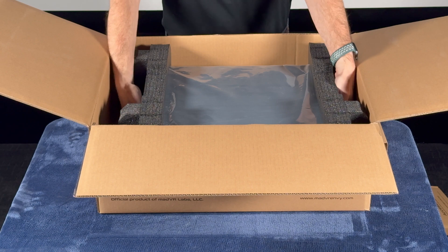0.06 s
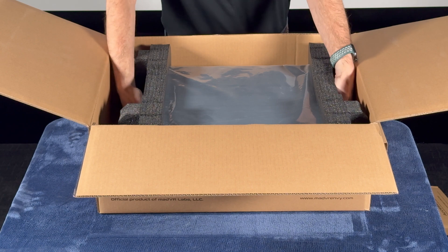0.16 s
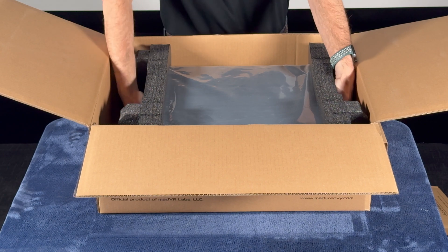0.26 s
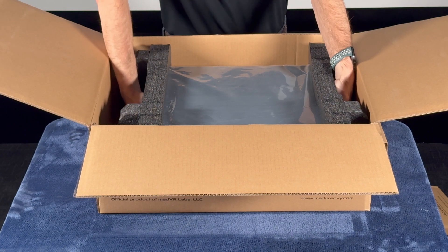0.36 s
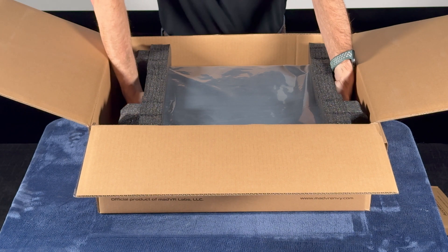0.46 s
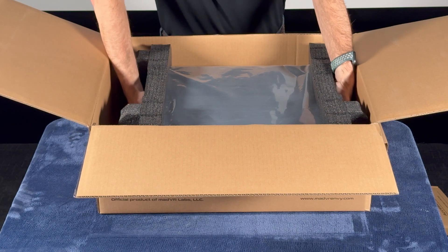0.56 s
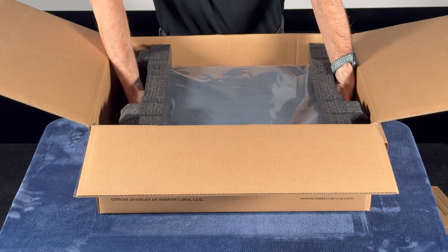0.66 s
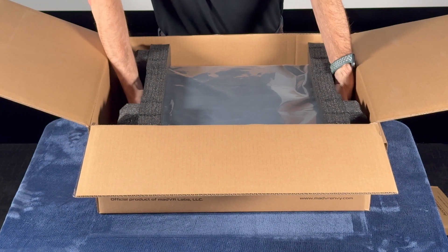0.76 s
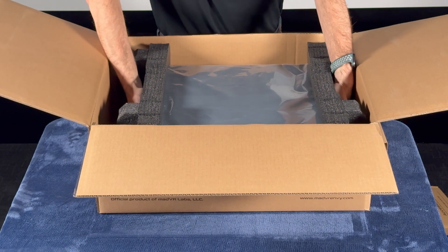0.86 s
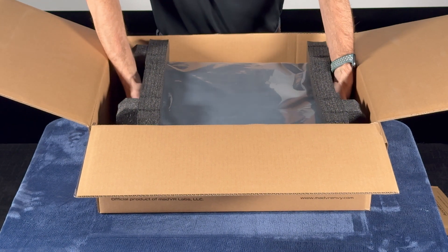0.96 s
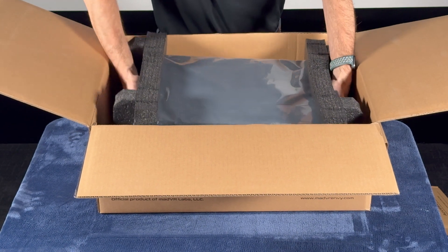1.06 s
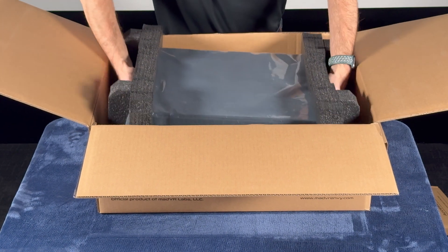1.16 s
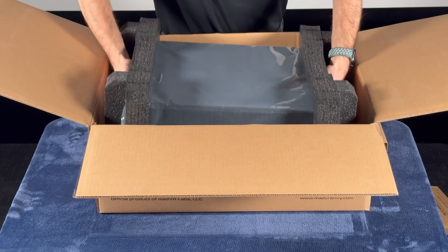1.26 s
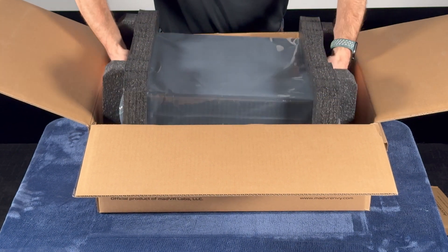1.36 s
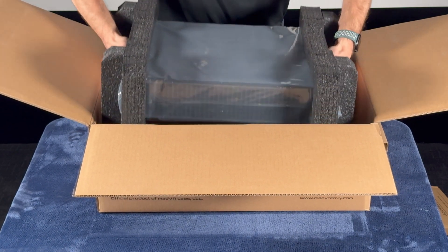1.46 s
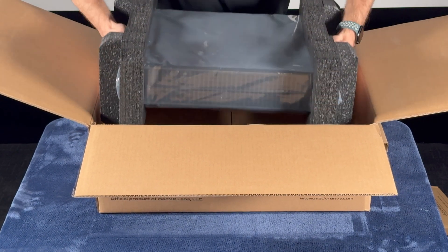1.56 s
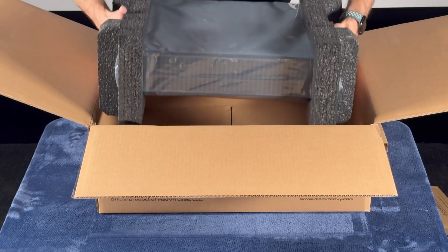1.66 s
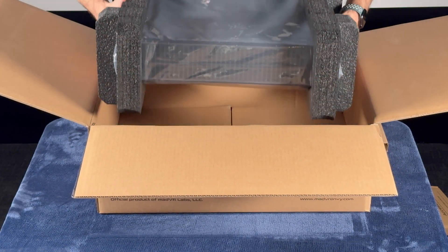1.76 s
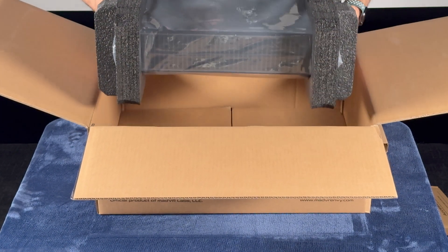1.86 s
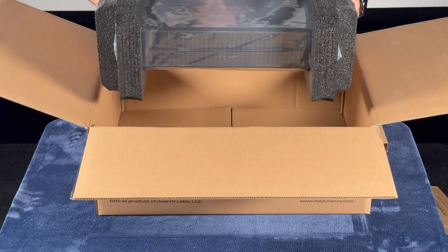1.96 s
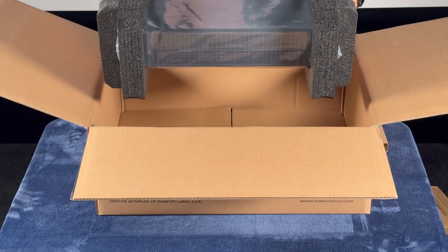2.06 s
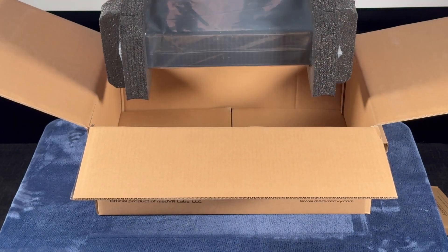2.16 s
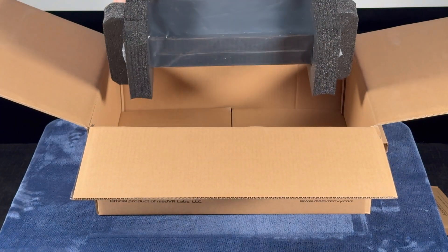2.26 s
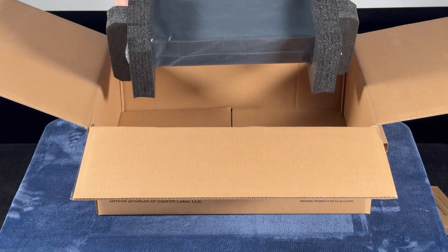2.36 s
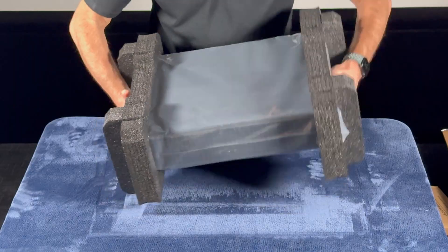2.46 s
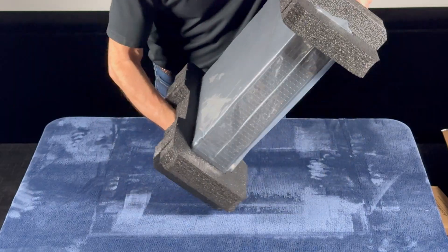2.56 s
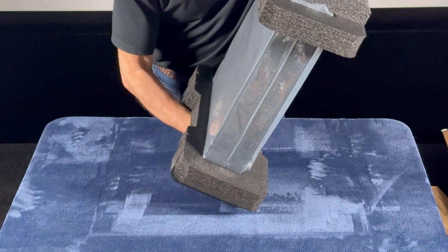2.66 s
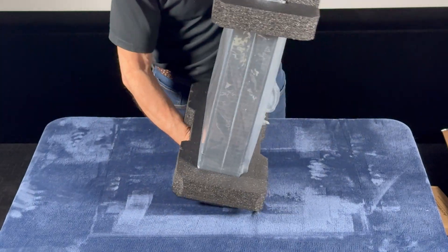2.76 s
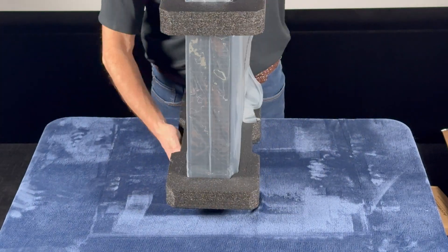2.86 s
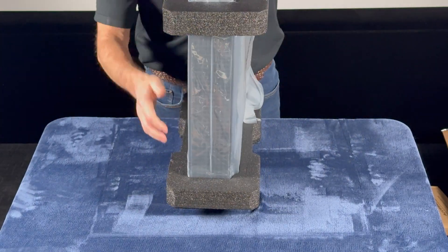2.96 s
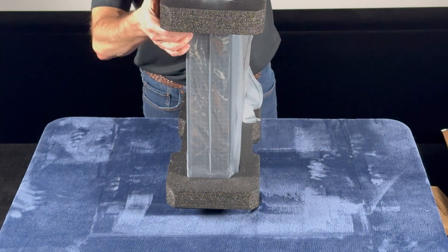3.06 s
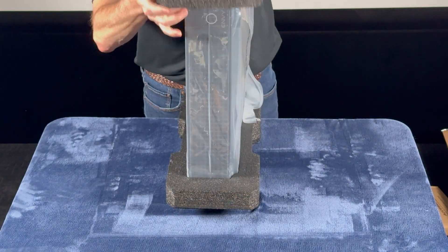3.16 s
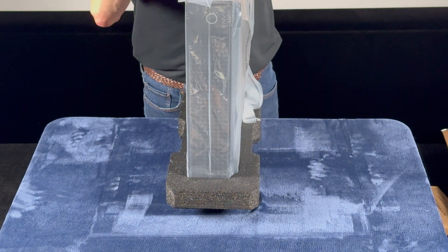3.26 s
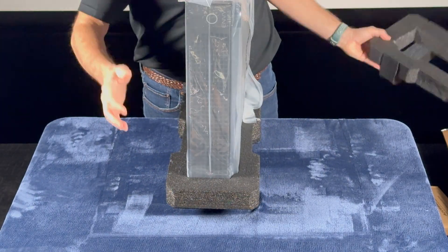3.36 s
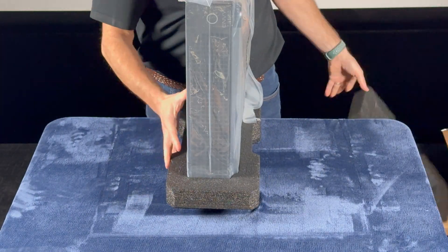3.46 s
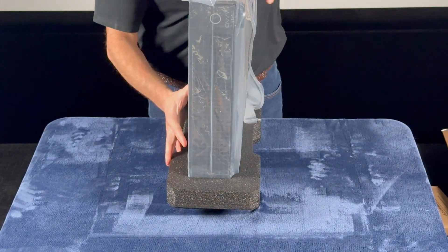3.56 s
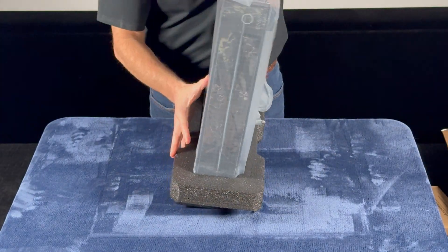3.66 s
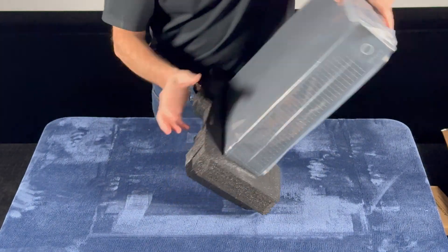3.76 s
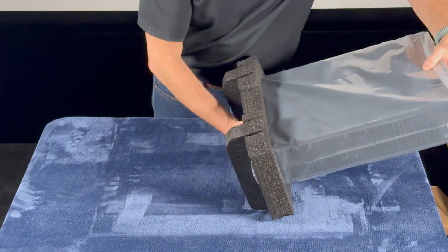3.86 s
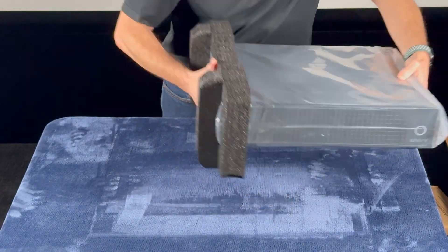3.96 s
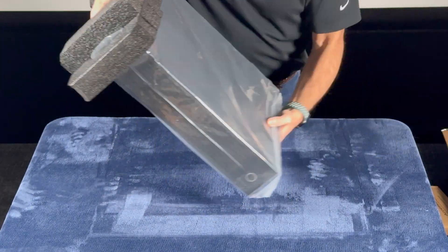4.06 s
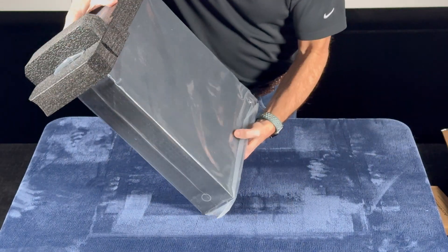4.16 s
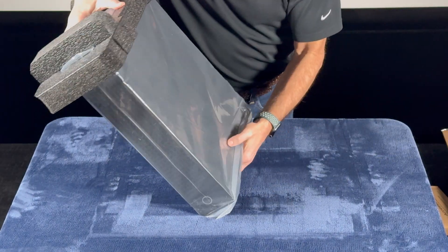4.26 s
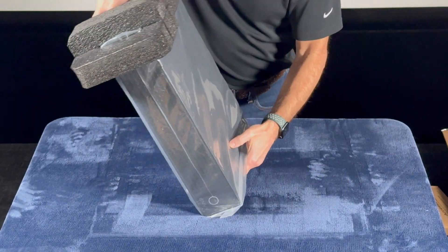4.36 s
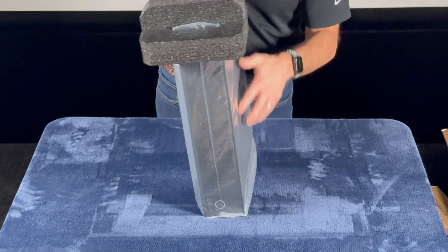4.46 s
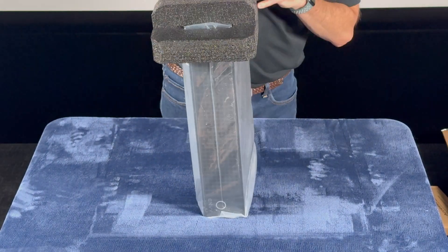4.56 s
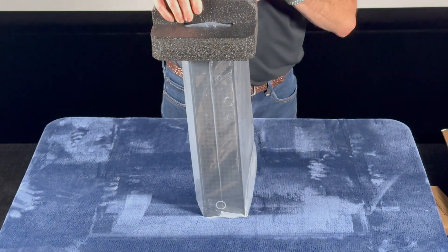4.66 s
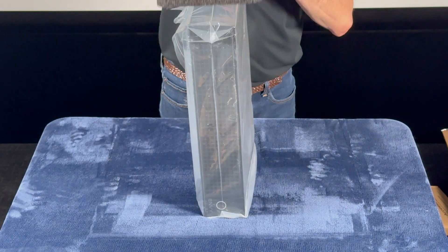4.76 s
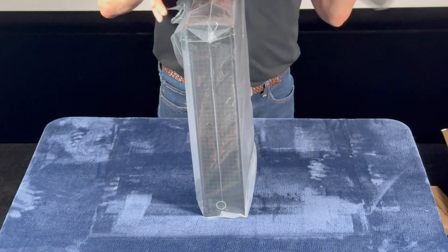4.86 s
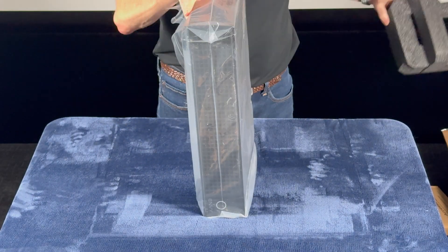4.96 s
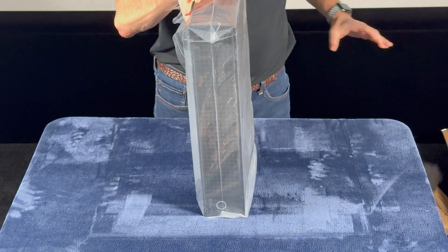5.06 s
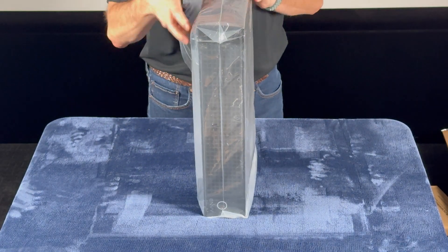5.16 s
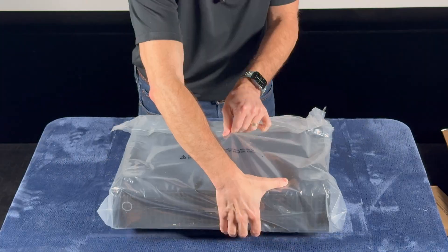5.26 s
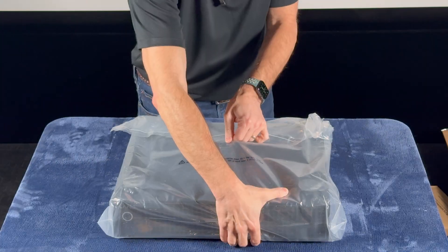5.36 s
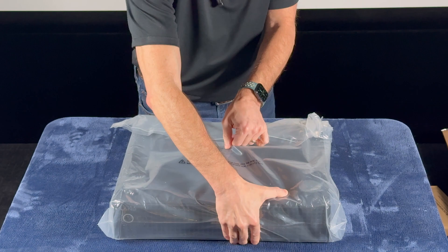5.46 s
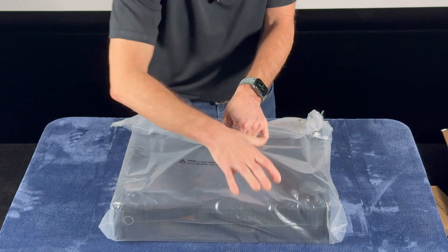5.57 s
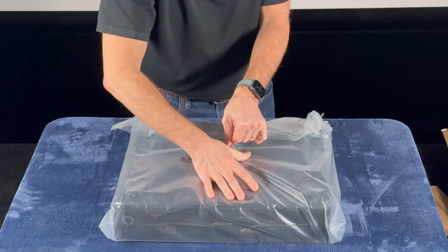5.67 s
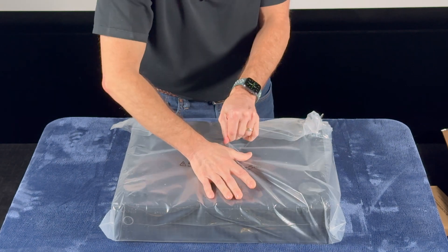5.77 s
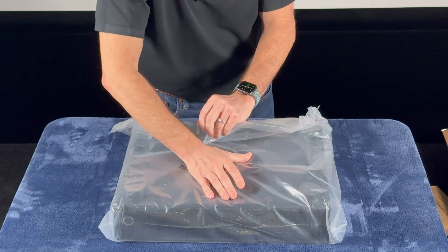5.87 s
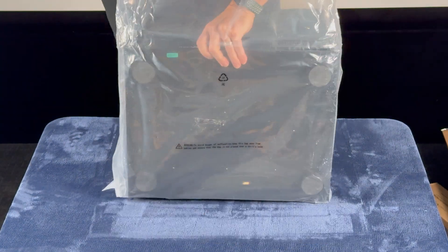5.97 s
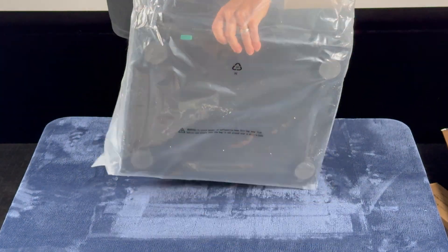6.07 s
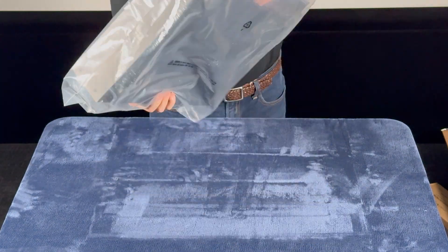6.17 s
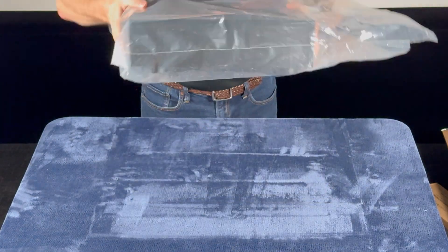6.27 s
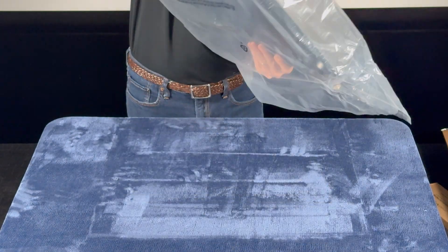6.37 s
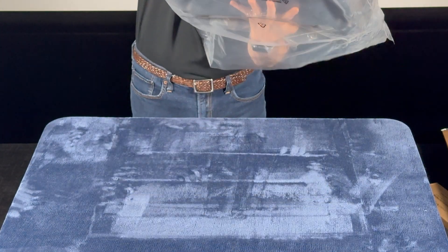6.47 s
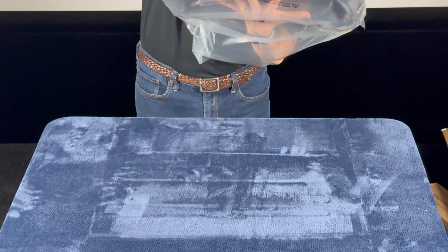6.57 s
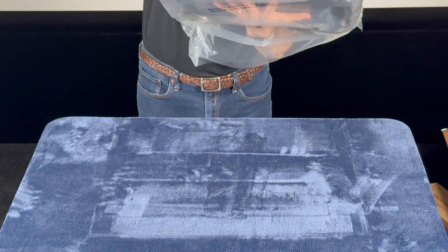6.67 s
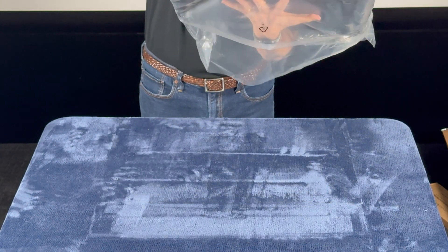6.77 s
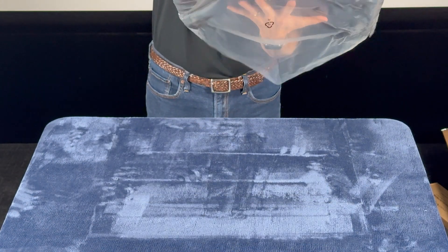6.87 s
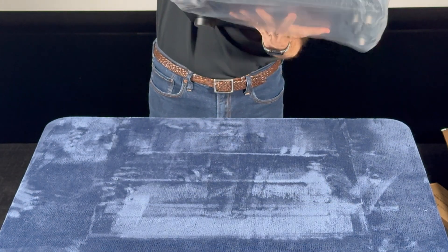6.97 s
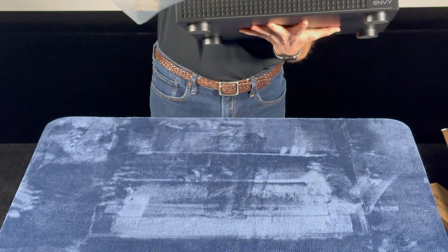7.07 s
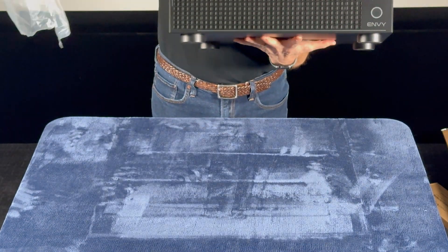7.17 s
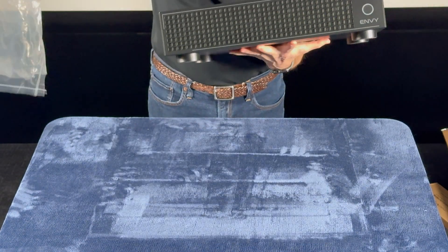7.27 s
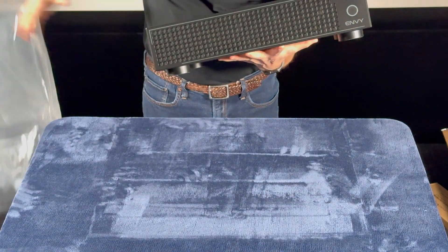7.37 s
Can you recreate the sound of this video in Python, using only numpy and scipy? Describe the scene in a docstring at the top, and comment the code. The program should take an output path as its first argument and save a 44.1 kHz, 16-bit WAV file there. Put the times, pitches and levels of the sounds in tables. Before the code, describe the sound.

Close, dry unboxing: soft hand knocks on cardboard, a rough foam drag, scattered plastic snaps, then a dense, loud burst of crinkling and flapping bag.

```python
"""Unpacking a boxed unit from a carton

A boxed unit in foam end caps is gripped and dragged up out of a cardboard carton, then turned about on a padded table.
Close to one microphone, slips of foam ring foam, carton and air gap; pops and hand bumps ring as short decaying events.
Then the thin plastic bag rustles and snaps as swarms of clicks through resonances, and its large folds flap low.
Behind it lies a very quiet room, made of coloured noise."""
import sys
import numpy as np
from scipy import signal
from scipy.io import wavfile

SR = 44100
rng = np.random.default_rng(int(sys.argv[2]) if len(sys.argv) > 2 else 0)


def generate_wav(sig):
    """Save sig (samples, or channels by samples) to the path in sys.argv[1] as 16-bit PCM at SR."""
    pcm = np.round(np.clip(np.atleast_2d(sig).T, -1, 1) * 32767).astype(np.int16)
    wavfile.write(sys.argv[1], SR, pcm)


N = 327296

LEAD, SPAN = int(.04 * SR), int(.16 * SR)   # samples before an event's peak and in all

# The hands shift on the bag. Each row: start in seconds, length in seconds, then at the start the rustle in dB,
# sizzle in dB and low flapping in dB, and the change of all three from start to end in dB.
GRIPS = [(2.686, 0.072, -56.5, -58, -69.5, -8.5), (2.777, 0.056, -56, -53.5, -65, -15.5),
         (2.843, 0.098, -73.5, -67, -75, 0.5), (2.942, 0.09, -50.5, -56.5, -61.5, 3),
         (3.043, 0.068, -39.5, -46.5, -60.5, -14.5), (3.14, 0.069, -54, -60, -72, -8),
         (3.262, 0.069, -45.5, -44.5, -48, -1.5), (3.344, 0.15, -55, -51, -68, -7),
         (3.752, 0.015, -39, -77, -41, -31), (3.811, 0.068, -63, -72, -71, 4),
         (3.916, 0.052, -57, -70, -73, -12), (3.966, 0.07, -48.5, -51, -55, -19),
         (4.032, 0.12, -43, -46, -55.5, -13), (4.218, 0.065, -56, -63, -63, -7),
         (4.294, 0.051, -55, -70, -61, -21), (4.359, 0.045, -49.5, -55, -79, -21),
         (4.413, 0.075, -42.5, -55.5, -53, -7), (4.5, 0.031, -56, -60.5, -70, 14.5),
         (4.535, 0.14, -54.5, -55, -47, -12.5), (4.647, 0.056, -45, -45, -51, 9.5),
         (4.735, 0.096, -48.5, -44, -44, -15.5), (4.874, 0.035, -38, -37.5, -62, -27),
         (4.922, 0.089, -54, -57, -71.5, 8), (5.332, 0.065, -67.5, -62, -72, -11.5),
         (5.413, 0.09, -77.5, -83, -79, -6), (5.627, 0.091, -68, -82, -65, -7),
         (5.69, 0.089, -51.5, -64, -54.5, -3), (5.852, 0.057, -53, -59, -62.5, -0.5),
         (5.921, 0.096, -61, -50.5, -67, -13), (6.021, 0.025, -37, -37, -55, -15),
         (6.071, 0.064, -67, -65, -76, -3), (6.191, 0.035, -54, -64, -84, 13)]
# The bag slides off. Each row: time in seconds, rustle in dB, sizzle in dB, low flapping in dB.
SLIDE = [(6.27, -120, -101, -74), (6.288, -49, -61, -64), (6.372, -38.5, -45, -49.5),
         (6.406, -18.5, -32.5, -31.5), (6.506, -42.5, -50, -37.5), (6.59, -30.5, -37.5, -39),
         (6.606, -45, -54, -40.5), (6.692, -32, -29, -33), (6.714, -30.5, -44, -22.5),
         (6.788, -42.5, -45, -33), (6.804, -26, -31, -31.5), (6.852, -41.5, -44.5, -34),
         (6.932, -22, -49, -28), (7.092, -45, -51, -56.5), (7.106, -31, -21, -32),
         (7.14, -30, -35.5, -32.5), (7.192, -40.5, -46.5, -53), (7.214, -20, -28, -36.5),
         (7.262, -44, -45, -61.5), (7.336, -84.5, -84, -77), (7.42, -101, -108, -96)]


def from_db(db):
    """Decibels to gain."""
    return 10 ** (np.asarray(db) / 20)


def rms_one(x):
    """Scale to unit rms."""
    return x / np.sqrt(np.mean(x ** 2) + 1e-20)


def in_time(rows):
    """A switch that is on inside the table's time span, then its columns at every sample."""
    s, *columns = np.transpose(rows)
    t = np.arange(N) / SR
    return [(t >= s[0]) & (t <= s[-1])] + [np.interp(t, s, c) for c in columns]


def drift(rate_hz):
    """Slow chance of rms 1: noise through two equal low-pass poles."""
    r = np.exp(-2 * np.pi * rate_hz / SR)
    slow = signal.lfilter([1], [1, -2 * r, r * r], rng.standard_normal(N + SR))
    return rms_one(slow[SR:])   # the first second settles the filter


def grains(per_s, spread_db):
    """Random micro-clicks of uneven size and either sign; rms 1."""
    sizes = from_db(spread_db * np.minimum(rng.exponential(1, N), 5)) * rng.choice([-1, 1], N)
    return rms_one(sizes * (rng.random(N) < per_s / SR))


def resonate(x, hz, width_hz):
    """Two-pole resonance with gain 1 on top."""
    r = np.exp(-np.pi * width_hz / SR)
    zeros = np.array([1, 0, -1]) * (1 - r * r) / 2
    poles = [1, -2 * r * np.cos(2 * np.pi * hz / SR), r * r]
    return signal.lfilter(zeros, poles, x)


def low_pass(x, hz):
    """Steep treble cut."""
    return signal.sosfilt(signal.butter(4, hz, fs=SR, output="sos"), x)


def band_pass(x, order, low_hz, high_hz):
    """Keep what lies between two pitches."""
    return signal.sosfilt(signal.butter(order, [low_hz, high_hz], "band", fs=SR, output="sos"), x)


def colour(x, spectrum, patchy_db):
    """Half-octave bands set to a spectrum, each flickering on its own; rms 1."""
    hz, db = np.transpose(spectrum)
    edges, out = 23 * 2 ** np.arange(0, 10, .5), 0
    for k, (low, high) in enumerate(zip(edges, edges[1:])):
        if hz[0] < high and low < hz[-1]:
            band = band_pass(x, 2, low, high)
            level_db = np.interp(np.log(low * high) / 2, np.log(hz), db)
            gain = from_db(level_db + patchy_db * drift(44.0))
            out = out + (-1) ** k * band * gain   # alternate signs join the bands without notches
    return rms_one(out)


def add(out, s, sound, swell_s, t60, tail_db, soft_s=0):
    """Lay in one event: it swells by 20 dB in swell_s to its peak at s, dies away and leaves a short tail."""
    tail_t60_s = 0.031   # a brief shiver outlasts short events
    t = (np.arange(SPAN) - LEAD) / SR
    away = np.hypot(t, soft_s) - soft_s   # a padded contact rounds the peak
    swell_db = -20 * away / max(swell_s, .0002)
    decay_db = -60 * away / np.clip(t60, .003, .2)
    main = from_db(np.where(t < 0, swell_db, decay_db))
    tail = (t > 0) * from_db(tail_db - 60 * t / tail_t60_s)
    i = round(s * SR) - LEAD
    out[max(i, 0):i + SPAN] += (sound * np.hypot(main, tail))[max(-i, 0):N - i]


def drag():
    """Dense slips of foam cells ring the foam, the carton walls and the air gap, which rises in pitch as it opens."""
    # Foam on cardboard. Each row: time in seconds, scrape in dB, carton boom in dB, fine hiss in dB.
    course = [(0.0, -63.5, -54, -70), (0.26, -69, -67, -78.5), (0.33, -57, -50, -70.5),
              (0.43, -67.5, -63, -78), (0.5, -56, -42.5, -66.5), (0.62, -71, -61, -74.5),
              (0.65, -73, -52, -82.5), (0.84, -64, -59.5, -83), (0.9, -80, -70, -72), (0.98, -65, -60, -84),
              (1.04, -76.5, -62, -88), (1.11, -54, -48, -79.5), (1.24, -36.5, -42.5, -51),
              (1.37, -39, -48.5, -51), (1.62, -38, -49, -46), (1.67, -37.5, -51, -46),
              (1.75, -32.5, -50, -44), (1.9, -40.5, -48.5, -49.5), (1.97, -35.5, -44.5, -42.5),
              (2.11, -38, -50, -52), (2.21, -70.5, -83, -80), (2.34, -84, -69.5, -100),
              (2.49, -101, -106, -108), (2.64, -101, -106, -107)]
    # Scrape resonances of the foam. Each row: pitch in Hz, width in Hz, level in dB.
    foam_modes = [(1300, 580, -8.5), (2140, 480, 1), (3440, 1060, -6), (4080, 2450, -11)]
    # The same resonances under light scuffing: one level in dB for each.
    scuff_db = [1.5, 8.5, -3, -8]
    # Carton walls. Each row: pitch in Hz, width in Hz, level in dB.
    wall_modes = [(56.2, 41, 5.5), (148, 31, 1.5), (245, 340, 4.5), (412, 360, 9)]
    # Spectrum of the fine hiss. Each row: frequency in Hz, density in dB per Hz.
    hiss_spectrum = [(2650, -32.5), (4500, 23.5), (6340, 12), (13900, -2), (15900, -15), (16200, -37),
                     (16500, -68)]
    lift_s, opening_s = 1.3, .2   # the foam starts up the wall; time constant of the air gap opening
    gap_shut_hz, gap_open_hz = 366, 736   # resonance of the air gap

    on, scrape_db, boom_db, hiss_db = in_time(course)
    opened = 1 - np.exp(-np.maximum(np.arange(N) / SR - lift_s, 0) / opening_s)
    gap_hz = gap_shut_hz + (gap_open_hz - gap_shut_hz) * opened
    grip = from_db(0.5 * drift(41.0))
    slips, shakes, fizz = (grains(7000.0, spread_db=3.0) * grip for part in range(3))

    wander_db = [3.0 * drift(7) for mode in foam_modes]   # the contact patch shifts: resonances come and go
    brighter_db = np.clip(hiss_db - scrape_db + 14.0, -14, 4)   # upper resonances open as the slide brightens
    broad, sharp = 0, 0
    for k, (hz, width, db) in enumerate(foam_modes):
        broad_gain = from_db(db + 0.36 * wander_db[k] + (hz > 2800) * brighter_db)
        broad = broad + (-1) ** k * broad_gain * resonate(slips, hz, 1.05 * width)
        ring = resonate(resonate(slips, hz, .65 * width), hz, .65 * width)
        sharp = sharp + from_db(scuff_db[k] + 1.5 * wander_db[k]) * ring
    walls = low_pass(sum(from_db(db) * resonate(shakes, hz, w) for hz, w, db in wall_modes), 550)

    gap, pitches = 0, np.geomspace(300, 900, 7)
    for hz in pitches:   # cross-fade between neighbouring pitches
        near = np.clip(1 - np.abs(np.log(gap_hz / hz)) / np.log(pitches[1] / pitches[0]), 0, 1)
        gap = gap + np.sqrt(near) * rms_one(resonate(resonate(shakes, hz, 280.0), hz, 600.0))

    # hard sliding blurs the foam's ring and excites the gap
    sliding = np.clip((scrape_db + 59.5) / 10.7, .05, .95)
    blur = np.maximum(sliding, .6 * opened)   # out in the open the ring stays blurred
    foam = np.sqrt(blur) * rms_one(broad) + np.sqrt(1 - blur) * rms_one(sharp)
    boom = np.sqrt(sliding) * gap + np.sqrt(1 - sliding) * rms_one(walls)
    hiss = colour(fizz, hiss_spectrum, patchy_db=0.7)
    return on * (from_db(scrape_db) * foam + from_db(hiss_db) * hiss + from_db(boom_db) * boom)


def room_air():
    """Faint noise, strongest in the bass, flickering band by band."""
    # Spectrum of the room. Each row: frequency in Hz, density in dB per Hz.
    air_spectrum = [(12, -34), (20, -1), (69, 6.5), (218, -20.5), (346, -23), (481, -39.5), (2000, -38),
                    (2600, -52.5), (4400, -120)]
    return from_db(-84) * colour(rng.standard_normal(N), air_spectrum, patchy_db=3)


def ticks():
    """Foam cells pop against the wall: short bursts with a ring of a few cycles."""
    # Each row: time in seconds, level in dB, pitch in Hz.
    pops = [(0.0488, -53, 1970), (0.163, -60, 2020), (0.2907, -51, 1980), (0.338, -51, 2160),
            (0.381, -52, 1330), (0.597, -53, 1950), (0.621, -54.5, 1920), (0.7627, -46, 2080),
            (0.787, -48, 1820), (0.847, -44, 2200), (0.983, -55.5, 1130), (2.301, -67, 3280),
            (2.3156, -59, 870), (2.3414, -72, 2460), (2.392, -65, 2620), (2.5514, -75, 1200)]
    out, noise = np.zeros(N), rng.standard_normal((len(pops), SPAN))
    for (s, db, hz), n in zip(pops, noise):
        ring = resonate(resonate(n, hz, 380.0), hz, 640.0)
        add(out, s, from_db(db) * rms_one(ring), swell_s=.002, t60=.03, tail_db=-31.0)
    return low_pass(out, 4500)


def thuds(events, rough, push, top_hz):
    """A soft push sets a broad panel swinging at its pitch, with rattle around it and a low shove of air."""
    push_hz = 250   # panels that swing below this pitch shove the most air
    out, noise = np.zeros(N), rng.standard_normal((len(events), 2, SPAN))
    for (s, db, hz, swell_s, t60), (rattle, air) in zip(events, noise):
        swing = np.sqrt(2) * np.cos(2 * np.pi * hz * (np.arange(SPAN) - LEAD) / SR)
        rattling = rough * rms_one(resonate(rattle, 360, 350.0))
        shove = push * min(push_hz / hz, 1) * rms_one(resonate(air, 83, 130.0))
        sound = from_db(db) * rms_one(swing + rattling + shove)
        add(out, s, sound, swell_s, t60, tail_db=-18.0, soft_s=0.0015)
    return low_pass(out, top_hz)


def handling():
    """Gains of rustle, sizzle and flapping: each grip sets in, swells or sags, lets go; then the bag slides off."""
    attack_s = 0.0026   # time to rise by 20 dB
    release_s = np.array([[0.015], [0.015], [0.089]])   # time to fall by 20 dB; the low flapping lingers
    t = np.arange(N) / SR
    on, *levels_db = in_time(SLIDE)
    out = on * from_db(levels_db)
    for s, length_s, *start_db, change_db in GRIPS:
        near = slice(int((s - .05) * SR), int((s + length_s + .3) * SR))
        since, left = t[near] - s, s + length_s - t[near]
        edge_db = 20 * np.minimum(np.minimum(since / attack_s, left / release_s), 0)
        sway_db = change_db * np.minimum(since / length_s, 1)
        grip = from_db(np.array(start_db)[:, None] + edge_db + sway_db)
        out[:, near] = np.maximum(out[:, near], grip)
    return out


def rustle(gains):
    """Many small creases crackle in clumps; broad folds stir the air below them."""
    # Spectra of the film's rustle, its sizzle and the low flapping.
    # Each row: frequency in Hz, density in dB per Hz.
    film_spectrum = [(410, -29.5), (700, -3.5), (1250, -1), (1410, 1.5), (1690, -0.5), (2300, 3),
                     (4630, -12.5), (5500, -14.5), (7150, -41), (12100, -120)]
    sizzle_spectrum = [(2650, -28.5), (4500, 5.5), (6320, 16), (7980, 12), (9480, 9.5), (15200, 3.5),
                       (16100, -15), (17000, -30)]
    flapping_spectrum = [(15, -46), (25, -13), (124, -4.5), (241, -2), (271, 1.5), (413, -14.5), (487, 4),
                         (900, -22), (1170, -36), (1980, -120)]
    crackle = grains(4000, spread_db=3.5) * from_db(3.0 * drift(50) + 2.5 * drift(14))
    film = colour(crackle, film_spectrum, patchy_db=3)
    sizzle = colour(crackle, sizzle_spectrum, patchy_db=2)
    flapping = colour(grains(2000, spread_db=3), flapping_spectrum, patchy_db=2)
    return gains[0] * film + gains[1] * sizzle + gains[2] * flapping


def snaps(events):
    """Each crease lets go as a swarm of clicks that rings the film at its pitch and two chance ones, and sprays treble."""
    low, high, count = np.zeros(N), np.zeros(N), len(events)
    clicks = rng.standard_normal((count, SPAN))
    swarm = clicks * from_db(3 * np.minimum(rng.exponential(1, (count, SPAN)), 5))
    chance_hz = 900 * 5 ** rng.random((count, 2))
    bright = band_pass(swarm, 2, 4500, 10500)
    top = band_pass(swarm, 3, 9500, 16200)
    for k, (s, body_db, bright_db, top_db, hz, swell_s, t60) in enumerate(events):
        body = rms_one(resonate(swarm[k], hz, 0.085 * hz))
        body += 0.68 * rms_one(resonate(swarm[k], 2200, 2800.0))
        body += 0.21 * sum(rms_one(resonate(swarm[k], f, 0.015 * f)) for f in chance_hz[k])
        add(low, s, from_db(body_db) * rms_one(body), swell_s, t60, tail_db=-5.5)
        spray = from_db(bright_db) * rms_one(bright[k]) + from_db(top_db) * rms_one(top[k])
        add(high, s, spray, swell_s, 0.55 * t60, tail_db=-26.0)   # treble dies sooner
    return low_pass(low, 6100) + high


def small_snaps(gains):
    """Rows for snaps() at chance moments, levelled and coloured around the rustle at that moment."""
    count = 260
    level_db, spread_db, colour_db = -2, 9.5, 10   # least level over the rustle, spread upward, brightness range
    top_db = -9   # top octave against the bright part
    when, pitch, size, shine = rng.random((count, 4)).T
    s = GRIPS[0][0] + when * (SLIDE[-1][0] - GRIPS[0][0])
    around_db = 20 * np.log10(gains[:2, (s * SR).astype(int)] + 1e-7)
    body_db, bright_db = around_db + level_db + spread_db * size
    bright_db = bright_db + colour_db * (shine - .5)
    rows = zip(s, body_db, bright_db, bright_db + top_db, 900 * 5 ** pitch)
    return [(*row, .001, .004) for row in rows]   # swell and t60 in seconds


def scene():
    """Everything close to one microphone: the carton, then the bag in the hands, over the air of the room."""
    # Carton wall bumped by a hand.
    # Each row: time in seconds, level in dB, wall pitch in Hz, swell in seconds, t60 in seconds.
    bumps = [(0.0528, -42.5, 169, 0.0033, 0.078), (0.1067, -58, 159, 0.017, 0.033),
             (0.1849, -53.5, 160.0, 0.051, 0.065), (0.3312, -42.0, 357, 0.053, 0.037),
             (0.3807, -50.5, 434, 0.0187, 0.067), (0.4917, -35.5, 138, 0.0064, 0.058),
             (0.5397, -67, 188, 0.04, 0.046), (0.6628, -29.5, 188, 0.0049, 0.04),
             (0.69, -42.5, 136, 0.028, 0.19), (0.7697, -45.5, 418, 0.0034, 0.06),
             (0.85, -53.5, 396, 0.0029, 0.08), (0.9919, -53.0, 355, 0.033, 0.016),
             (1.1291, -43, 377, 0.021, 0.062), (1.25, -42.5, 161, 0.012, 0.14),
             (1.935, -44.5, 92, 0.0092, 0.07), (2.32, -73, 297, 0.011, 0.044)]
    # Single creases letting go, faint to loud. Each row: time in seconds, body in dB, bright part in dB, top in dB,
    # crease pitch in Hz, swell in seconds, t60 of the body in seconds.
    creases = [(2.6937, -54, -60, -59, 1600.0, 0.011, 0.019),
               (2.7051, -39.5, -43.5, -57.0, 1560, 0.00053, 0.013),
               (2.789, -34, -47, -58.0, 2500, 0.0006, 0.0061),
               (2.9121, -49, -59, -69.0, 4100, 0.0015, 0.0073),
               (2.9867, -39, -31.5, -53, 2440, 0.0008, 0.005),
               (3.0288, -39.0, -38, -47, 2110, 0.002, 0.007), (3.1531, -31.5, -43, -62, 5100, 0.016, 0.024),
               (3.19, -25, -27.5, -31, 2360, 0.0084, 0.022),
               (3.2225, -35, -30.0, -62, 800.0, 0.0075, 0.027),
               (3.266, -35.5, -32.5, -43, 990, 0.0018, 0.063), (3.295, -41, -34.5, -54, 790, 0.0073, 0.13),
               (3.3473, -36, -62, -68.0, 2170, 0.0012, 0.0091),
               (3.3902, -29, -41, -41.0, 1970, 0.0008, 0.075), (3.4144, -22.5, -21, -56, 2850, 0.02, 0.065),
               (3.4666, -38.5, -40, -49, 1630, 0.01, 0.012),
               (3.6075, -53.5, -49.5, -57, 3100, 0.0032, 0.03), (3.688, -73, -72, -95, 3000, 0.0074, 0.07),
               (3.7465, -29.5, -53.0, -79.5, 1480, 0.0015, 0.031),
               (3.788, -50, -64, -80.0, 1500.0, 0.0095, 0.0094),
               (3.8138, -39.5, -71, -62, 3330, 0.0014, 0.039),
               (3.8405, -27.5, -47.5, -68, 3250, 0.0033, 0.048), (3.92, -73, -60, -75, 2300, 0.0032, 0.06),
               (3.9812, -48, -36.5, -31, 870, 0.001, 0.005), (3.994, -38, -45, -41, 1460.0, 0.0028, 0.02),
               (4.0137, -42, -65, -49, 870, 0.0007, 0.036),
               (4.0409, -35.0, -31.0, -28, 4950.0, 0.0009, 0.013),
               (4.0466, -32, -18.5, -40, 1550, 0.0009, 0.0033),
               (4.0688, -29.5, -24, -36, 1470, 0.0013, 0.0042),
               (4.1656, -49.5, -47, -70, 1990, 0.0013, 0.043),
               (4.2232, -35.5, -40, -31, 1430.0, 0.0012, 0.01),
               (4.2343, -36.5, -32, -50, 2080, 0.0007, 0.0098),
               (4.2509, -20.5, -24, -16.5, 4930, 0.0012, 0.0028),
               (4.2719, -46, -33.5, -54, 1620, 0.001, 0.0076),
               (4.2985, -40, -45.0, -56, 2050, 0.001, 0.021),
               (4.3132, -34, -33.5, -47, 1600, 0.0014, 0.0084),
               (4.3512, -41, -41, -60.0, 2070, 0.00054, 0.014),
               (4.3771, -49, -59, -39, 1480, 0.0011, 0.015),
               (4.421, -40.5, -37.5, -35, 3670, 0.012, 0.0056),
               (4.4715, -55, -30.5, -52, 4780, 0.00083, 0.008),
               (4.5073, -41, -35, -37, 1640.0, 0.0007, 0.007), (4.543, -32.5, -40, -59, 850, 0.0026, 0.035),
               (4.5608, -35.0, -19, -31, 3430, 0.00045, 0.0031),
               (4.592, -37, -42, -71.0, 2130, 0.0013, 0.017),
               (4.6093, -57, -49, -61.0, 800.0, 0.0007, 0.006),
               (4.6588, -40, -26, -43, 1850.0, 0.0011, 0.0054),
               (4.6837, -29.5, -51, -31.0, 950, 0.016, 0.021), (4.701, -43, -35, -32, 820, 0.0016, 0.006),
               (4.7194, -35, -27.5, -57.0, 3860, 0.00073, 0.0064),
               (4.747, -35, -23.5, -40, 880.0, 0.0042, 0.0039), (4.771, -42, -35, -58, 820, 0.0007, 0.0064),
               (4.804, -52, -47, -70, 960, 0.0066, 0.048), (4.8829, -21.5, -29.5, -39, 1484, 0.0095, 0.004),
               (4.9447, -51, -28, -35, 2630.0, 0.0018, 0.0049),
               (4.9666, -38.5, -41, -51, 1070, 0.001, 0.11), (5.0013, -20, -11.5, -23, 2210, 0.0057, 0.014),
               (5.0298, -43.5, -41.5, -56, 1041, 0.0044, 0.02),
               (5.33, -35.0, -41, -53, 1920, 0.0026, 0.035), (5.4228, -58, -53.5, -64, 985, 0.0062, 0.026),
               (5.4685, -54.5, -85, -96, 1510.0, 0.0016, 0.011), (5.503, -70, -78, -96, 3900, 0.001, 0.01),
               (5.5333, -58, -56, -73.5, 4130, 0.00073, 0.007),
               (5.596, -68, -90, -100, 1050, 0.0092, 0.037), (5.6274, -40, -36, -43, 1340, 0.0011, 0.011),
               (5.64, -45, -58, -73.0, 4540, 0.001, 0.011), (5.676, -45, -75, -88, 1130, 0.0054, 0.03),
               (5.7005, -36.5, -42, -52, 1060, 0.0089, 0.014), (5.728, -24, -21, -26, 1077, 0.0014, 0.0077),
               (5.7349, -25.0, -25, -46.0, 2560, 0.00088, 0.005),
               (5.7575, -54, -50, -41, 1000.0, 0.0065, 0.0096),
               (5.7701, -23, -30, -54.0, 3480.0, 0.00082, 0.02),
               (5.7803, -22, -20.5, -28.5, 1140, 0.0015, 0.044),
               (5.8252, -55, -42, -72.0, 4900, 0.0009, 0.005),
               (5.856, -35.5, -36, -42, 2530, 0.0015, 0.087),
               (5.8842, -19.5, -26.5, -37, 933, 0.0015, 0.011),
               (5.8973, -21, -23, -29, 3880, 0.0008, 0.012), (5.9073, -32.5, -31, -40, 1410, 0.001, 0.021),
               (5.9407, -38, -29.5, -44.0, 3420, 0.0013, 0.0056),
               (5.9579, -35, -50.0, -67.0, 3930.0, 0.0008, 0.005),
               (5.9715, -37.5, -41, -58.0, 2500, 0.00076, 0.012),
               (5.9902, -42, -41, -60.0, 2410.0, 0.001, 0.009), (6.0223, -9, -3, -6, 3940, 0.00088, 0.0017),
               (6.0429, -35.0, -35, -52.0, 1180.0, 0.015, 0.008),
               (6.0832, -50.0, -35, -73.0, 4440, 0.0011, 0.004),
               (6.1004, -21.5, -11, -16, 1044, 0.0021, 0.02), (6.1313, -49, -52, -46, 1130, 0.0011, 0.029),
               (6.2041, -35.0, -42, -49, 2210.0, 0.0011, 0.0087),
               (6.2177, -36.0, -29.5, -56, 1920, 0.00085, 0.006),
               (6.2619, -48, -47, -88.0, 2700, 0.00096, 0.0093),
               (6.2922, -38, -40.5, -51, 2820, 0.0034, 0.025),
               (6.3464, -24, -31, -51.0, 2115, 0.00065, 0.011),
               (6.3608, -20, -27, -42, 2200, 0.0013, 0.0056),
               (6.3884, -32, -37, -41.0, 2210.0, 0.00064, 0.007),
               (6.4035, -18, -18, -34, 1560, 0.0012, 0.037), (6.4121, -17, -23, -34, 1970, 0.016, 0.008),
               (6.4243, -9.5, -26, -20, 1500, 0.0019, 0.0056),
               (6.4382, -29, -15.5, -32, 2260, 0.002, 0.006), (6.457, -26, -26, -15.5, 1430, 0.0007, 0.005),
               (6.4682, -25.5, -23, -43.0, 2790, 0.0012, 0.007),
               (6.4813, -19.5, -26, -40.0, 2150, 0.0017, 0.012),
               (6.5124, -28.5, -36, -47.0, 1316, 0.0091, 0.007),
               (6.5632, -23, -18, -14.5, 3350.0, 0.00083, 0.0038),
               (6.5709, -23, -20.5, -29, 3730, 0.003, 0.012),
               (6.5816, -21, -13.5, -32, 1430, 0.00056, 0.011),
               (6.6257, -24.5, -25.5, -23, 1980, 0.0026, 0.0053),
               (6.6447, -21, -23, -43, 2910.0, 0.0011, 0.0046),
               (6.6712, -20.5, -35.0, -34.0, 2460.0, 0.0019, 0.0096),
               (6.6793, -37, -15, -40, 2400.0, 0.0015, 0.0034),
               (6.6856, -25.5, -21, -34, 1630.0, 0.0007, 0.028),
               (6.7014, -22, -29, -15.5, 3600, 0.0009, 0.012),
               (6.7138, -36, -19, -34, 2240.0, 0.0053, 0.012),
               (6.7287, -11.5, -11, -18, 790, 0.00057, 0.0098),
               (6.7624, -23.5, -21, -20, 3440, 0.0089, 0.0088),
               (6.7722, -25, -12, -32, 1080, 0.00056, 0.007), (6.8049, -20, -29, -46, 4160, 0.017, 0.077),
               (6.8748, -23, -30.5, -50.0, 2090.0, 0.0023, 0.008),
               (6.8944, -21, -38, -51.0, 2650, 0.0009, 0.0042),
               (6.9181, -18.5, -27.0, -35.0, 2900, 0.017, 0.018),
               (6.9309, -13.5, -16.5, -47, 1410, 0.00079, 0.0097),
               (6.9408, -27, -29.0, -40, 1420, 0.004, 0.038),
               (6.9566, -25, -22, -50, 2270, 0.00098, 0.0061),
               (6.9808, -17.5, -28, -48, 1800.0, 0.0028, 0.0062),
               (7.0217, -23, -37, -65.0, 1430, 0.0014, 0.069),
               (7.0676, -22, -18.5, -48, 4000, 0.0012, 0.0049),
               (7.1061, -33, -25, -31, 1312, 0.0007, 0.014), (7.1203, -25, -19, -14, 2810.0, 0.001, 0.005),
               (7.1309, -24.0, -34, -36, 3900, 0.0007, 0.021),
               (7.1437, -17, -32, -34, 965, 0.00067, 0.0099),
               (7.2114, -18, -31, -35.0, 2150, 0.0077, 0.025), (7.242, -26.5, -38, -48, 2840, 0.027, 0.09)]
    # Large folds and the unit thudding.
    # Each row: time in seconds, level in dB, pitch in Hz, swell in seconds, t60 in seconds.
    flaps = [(2.8385, -51, 98, 0.013, 0.038), (3.1516, -55, 837, 0.0077, 0.023),
             (3.2251, -39.5, 774, 0.014, 0.015), (3.267, -36, 462, 0.0038, 0.03),
             (3.4127, -21, 380.0, 0.014, 0.051), (3.7488, -34, 785, 0.0032, 0.017),
             (3.8159, -42.5, 630, 0.0039, 0.017), (3.8438, -45, 840, 0.0041, 0.035),
             (3.998, -45, 158, 0.004, 0.044), (4.0128, -52, 320.0, 0.0012, 0.03),
             (4.0802, -46.0, 523, 0.0087, 0.024), (4.103, -54, 158.4, 0.026, 0.061),
             (4.426, -34, 218, 0.0022, 0.049), (4.5448, -16.5, 435, 0.0038, 0.016),
             (4.57, -31.5, 156, 0.022, 0.027), (4.6649, -25, 406, 0.0032, 0.024),
             (4.681, -25, 760, 0.0019, 0.011), (4.7026, -23, 312, 0.014, 0.0079),
             (4.7549, -23, 544, 0.008, 0.014), (4.833, -43.5, 654, 0.0055, 0.011),
             (4.88, -34.5, 730, 0.006, 0.033), (5.0055, -29, 325, 0.02, 0.016),
             (5.039, -50.5, 108, 0.013, 0.035), (5.3328, -36.5, 775, 0.0055, 0.054),
             (5.4217, -44.5, 293, 0.0045, 0.025), (5.4691, -44, 290.0, 0.0053, 0.028),
             (5.7303, -43, 563, 0.013, 0.011), (5.7873, -35.0, 640, 0.0043, 0.027),
             (5.8885, -37, 845, 0.0062, 0.032), (6.0328, -47, 318, 0.0076, 0.06),
             (6.1024, -39, 600, 0.0036, 0.047), (6.225, -48.5, 169, 0.0061, 0.066),
             (6.4051, -17.5, 293, 0.0072, 0.02), (6.5854, -28, 363, 0.018, 0.013),
             (6.62, -26.5, 322, 0.004, 0.04), (6.6639, -22.5, 770, 0.0043, 0.0082),
             (6.7176, -16, 284, 0.0035, 0.05), (6.7953, -32, 294, 0.0055, 0.039),
             (6.884, -37, 233, 0.0034, 0.1), (6.9407, -17.5, 197, 0.0028, 0.019),
             (6.981, -26.5, 146, 0.021, 0.074), (7.0688, -32.5, 218, 0.012, 0.019),
             (7.1446, -32.5, 560, 0.0069, 0.072), (7.2131, -27, 790.0, 0.0146, 0.042)]
    carton = drag() + ticks() + thuds(bumps, rough=0.52, push=0.35, top_hz=694)
    hands = handling()
    bag = rustle(hands) + snaps(creases) + snaps(small_snaps(hands))
    folds = thuds(flaps, rough=0.95, push=0.68, top_hz=1280)
    return (carton + bag + folds + room_air())[None]


def record(dry):
    """The highest peaks are rounded, the top is cut steeply."""
    rounded = np.tanh(dry)
    cut = signal.cheby2(12, 70, 17150, fs=SR, output="sos")   # 70 dB down from 17150 Hz up
    return signal.sosfilt(cut, rounded)


dry = scene()
out = record(dry)
generate_wav(out)
```